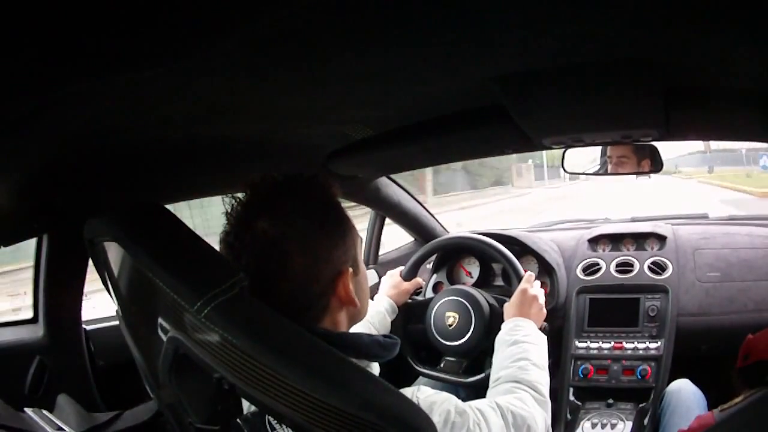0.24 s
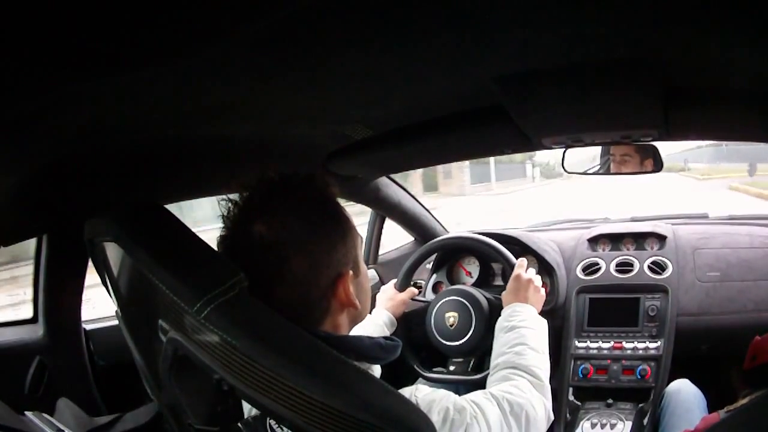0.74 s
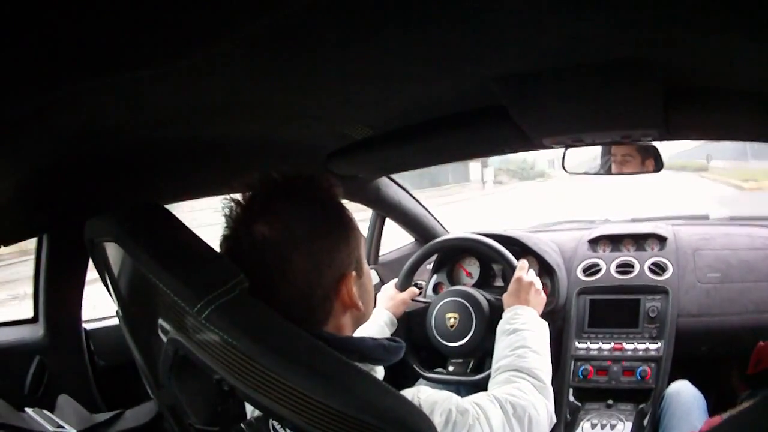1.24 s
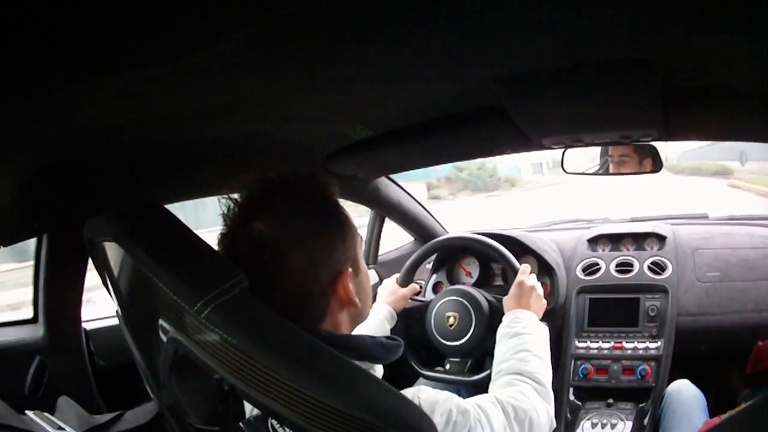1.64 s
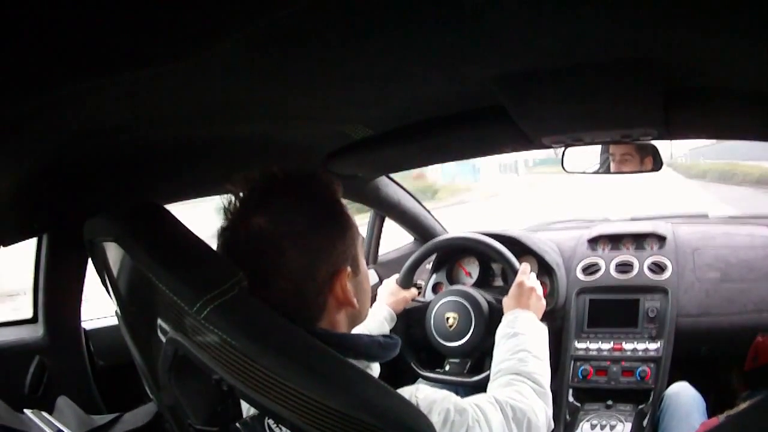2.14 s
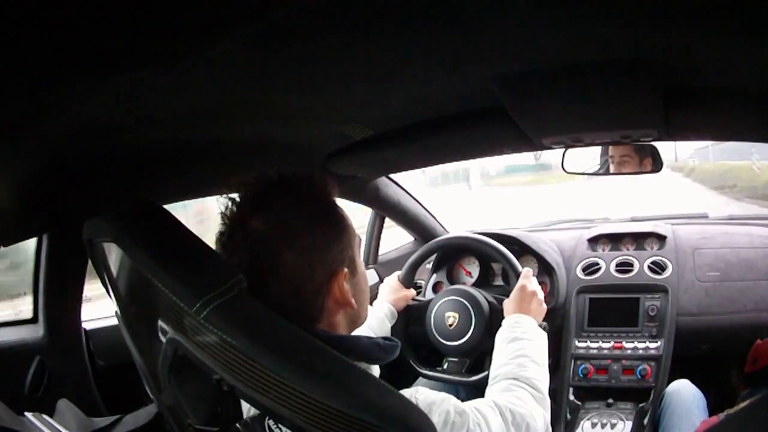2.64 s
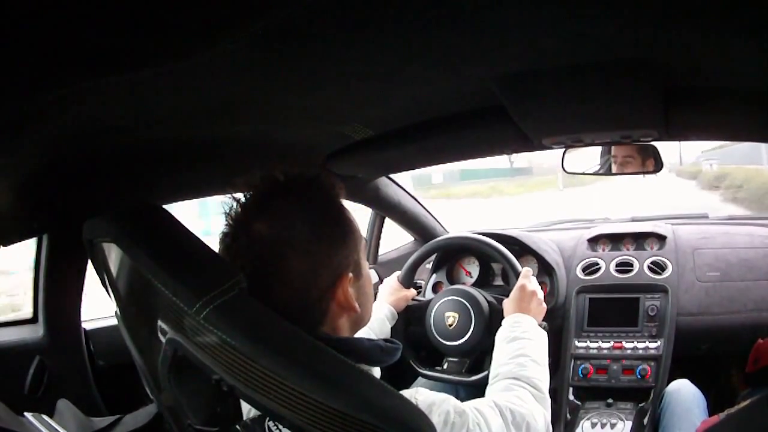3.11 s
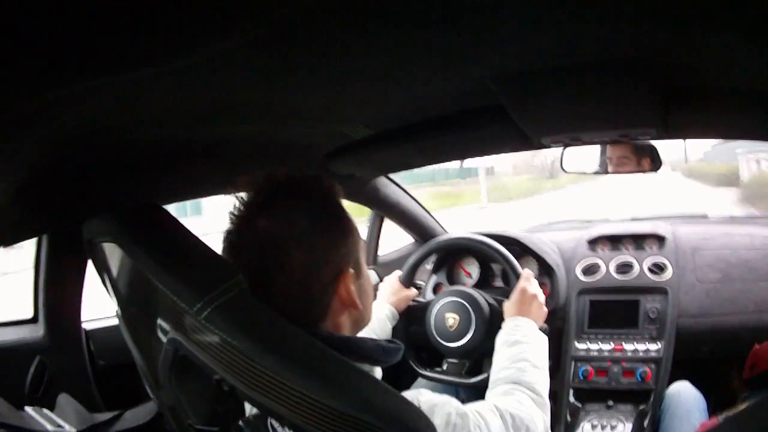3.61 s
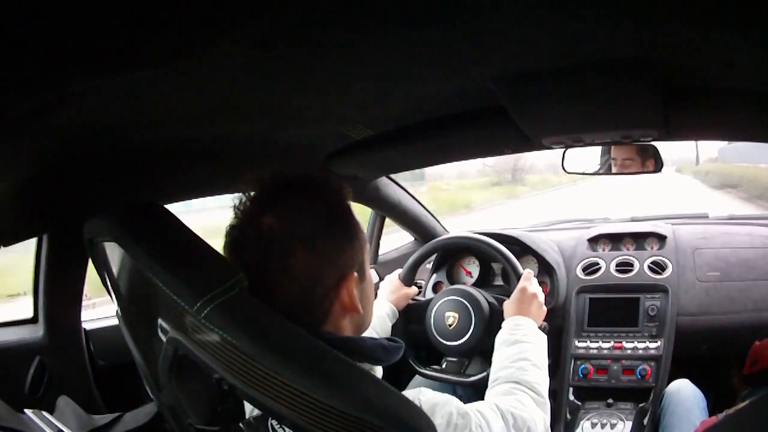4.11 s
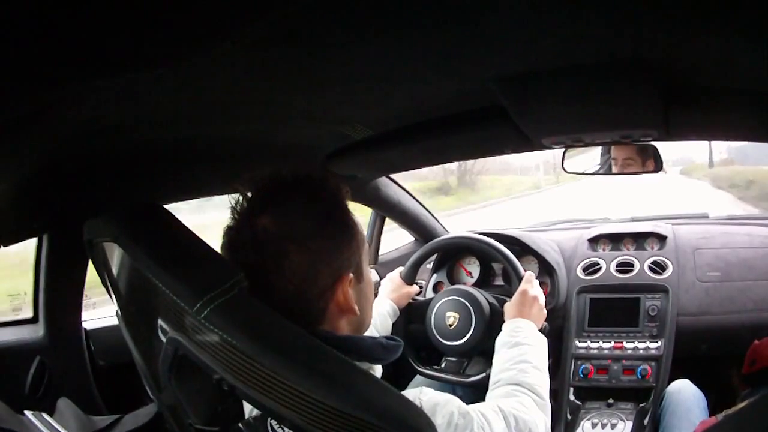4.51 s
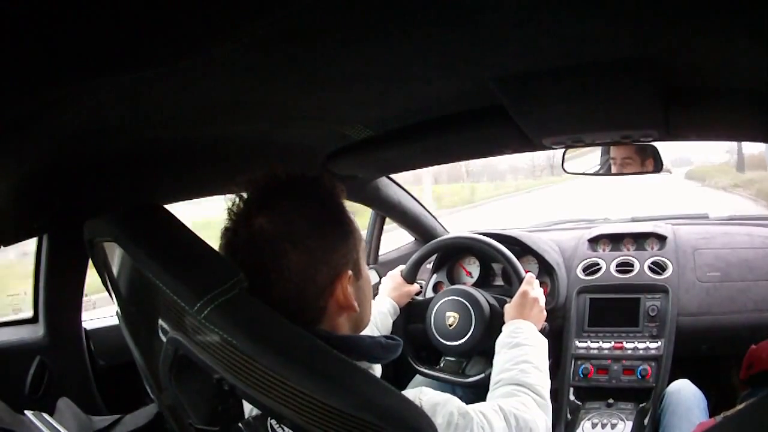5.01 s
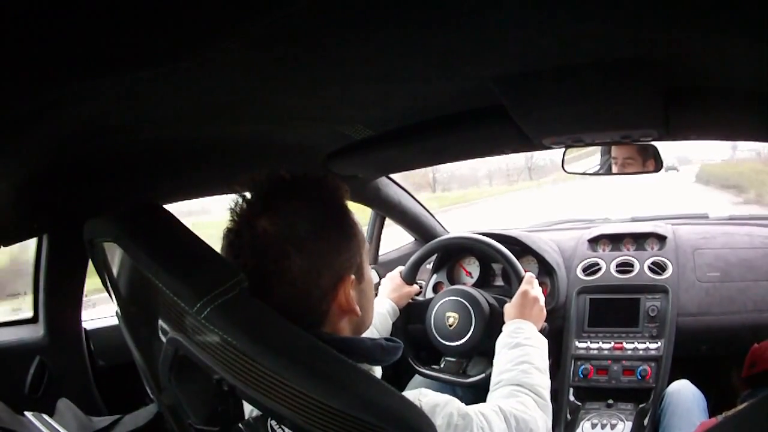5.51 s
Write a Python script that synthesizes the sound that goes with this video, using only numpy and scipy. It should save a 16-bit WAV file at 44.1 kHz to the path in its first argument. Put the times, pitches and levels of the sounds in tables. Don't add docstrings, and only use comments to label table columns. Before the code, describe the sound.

A car rides over patched asphalt, heard from inside: deep bassy thumps, tyre roar, a droning engine that swells midway, and brief plastic knocks.

```python
import sys
import numpy as np
from scipy import signal
from scipy.io import wavfile
from scipy.ndimage import uniform_filter1d, map_coordinates

SR = 44100
rng = np.random.default_rng(int(sys.argv[2]) if len(sys.argv) > 2 else 0)


def master(y):
    cut = np.clip(np.atleast_2d(y).T, -1, 1)
    pcm = np.round(cut * 32767)
    wavfile.write(sys.argv[1], SR, pcm.astype(np.int16))


def amplitude_ratio(level_db):
    exponent = np.asarray(level_db, float) / 20
    return 10 ** exponent


N = 253575
TIME = np.arange(N) / SR

# [t/s, level/dB]
THROTTLE = [(0, -27), (.12, -28.5), (.27, -41), (.5, -43.5), (1.3, -43), (2, -45), (2.3, -35.5), (2.6, -40),
            (2.9, -34.5), (3.3, -28.5), (3.55, -29.5), (3.7, -42), (4.4, -39.5), (5.2, -43.5), (5.75, -48)]
# [t/s, engine cycles per s]
ENGINE_SPEED = [(0, 27), (.5, 26.85), (1.1, 26.6), (2, 26.5), (2.72, 26.62), (3.17, 26.83), (3.47, 27.1),
                (3.8, 27.2), (4.3, 26.9), (5.3, 26.85), (5.75, 26.7)]
# [multiple of the engine cycle, level/dB]
ENGINE_ORDERS = [(1, -9), (2, -7.5), (3, -18.5), (4, -13.5), (5, -9), (6, -13), (7, -22), (8, -7.5),
                 (9, -17), (10, -5), (11, -6.5), (12, -6.5), (13, -16), (14, -9), (15, -8.5), (16, -13.5),
                 (17, -19.5), (18, -22.5), (19, -26.5), (20, -33.5), (21, -19.5), (22, -29.5), (23, -22),
                 (24, -17.5), (25, -18), (26, -28.5), (27, -43), (28, -17), (29, -26.5), (30, -31)]
# [multiple of the engine cycle, level/dB]
GEAR_WHINE = [(50, -68.5)]
# [start t/s, length/s, level/dB]
LUGGING = [
    (.05, 0.21, -45),
    (2.05, 0.32, -43),
    (2.75, 0.17, -45.5),
    (5.1, 0.13, -43.5),
]
# [t/s, level/dB]
SWELLS = [(0.0, -16.5), (1.25, -22.5), (1.34, -15), (1.52, -15), (1.67, -18), (1.84, -4), (2.27, -24),
          (2.34, -5.5), (2.82, -21.5), (3.83, -9.5), (3.91, -22.5), (4.2, -11.5), (4.53, -21.5),
          (5.49, -10), (5.61, -12.5), (5.75, 0)]
# [start t/s, length/s, rumble level/dB, floor drum over the rumble/dB]
PATCHES = [(0, 0.043, -11, -5), (0.297, 0.12, -27.5, -10), (.72, 0.084, -39, -23),
           (1.273, 0.063, -14, -9.5), (1.357, .2, -10.5, -8.5), (1.685, 0.086, -29, -12),
           (1.87, .12, -20, -8), (2.02, 0.17, -18.5, -7.5), (2.183, 0.11, -7.5, -19),
           (2.324, 0.11, -12.5, -14), (2.856, 0.08, -21.5, -22), (3.497, 0.035, -25.5, 3.5),
           (3.623, 0.09, -9.5, -9.5), (3.705, 0.11, -13, -4.5), (4.023, 0.037, -24, -28),
           (4.388, 0.11, -38, -3), (4.545, 0.071, -28.5, 0), (4.673, 0.23, -24, -5), (4.86, 0.13, -24, -11),
           (5.134, 0.13, -24, -23), (5.327, 0.084, -27.5, -12), (5.63, 0.11, -29, -20)]
# [start t/s, length/s, level/dB]
BOOM_RIPPLES = [(0, 0.1, -16), (.72, 0.028, -23), (.98, .05, -23.5), (1.3, 0.067, -13), (2.0, 0.38, -24.5),
                (2.45, 0.29, -30), (3.05, 0.19, -27.5), (3.4, .2, -22), (3.7, 0.23, -24), (4.48, .16, -20),
                (4.7, .08, -20), (4.82, .1, -20.5), (4.98, 0.12, -22.5), (5.15, 0.093, -25)]
# [gain step t/s, height, width/ms, tick level/dB]
JOLTS = [(.006, 0.61, 13.8, -77), (1.328, -0.68, 5.9, -58), (1.3662, 1, 8, -34), (1.401, -.89, 6.4, -38),
         (1.46, .9, 17, -38.5), (1.4766, .78, 5.1, -36), (1.5118, -0.62, 35, -36), (1.56, 0.6, 12, -48),
         (1.5864, -0.5, 10.5, -39), (1.9062, 0.52, 16.3, -39), (1.986, -0.53, 22, -41.5),
         (2.0433, 0.53, 16, -41), (2.0545, 0.4, 7.9, -43.5), (2.094, 0.73, 6.9, -63),
         (2.2178, 0.81, 4.6, -40.5), (2.3352, -0.64, 8.8, -53.5), (2.377, .92, 31, -34),
         (2.4504, -1.04, 21.5, -36.5), (3.64, 1, 4.9, -42.5), (3.6606, -1.6, 4.5, -41),
         (3.6877, 0.8, 19, -39), (3.703, -1.1, 7.8, -53), (3.7423, -0.94, 7, -37.5),
         (3.769, -1.05, 12, -45.5), (3.7913, 0.61, 19, -41), (3.833, 0.99, 6.3, -40.5),
         (3.8482, -0.83, 10.4, -40.5), (5.37, -0.58, 29, -39.5), (5.4404, 0.66, 16.4, -37),
         (5.742, 0.25, 50, -80)]
# [start t/s, length/s, level/dB]
RIBS = [
    (4.68, 0.27, -32.5),
]
# [f/Hz, level/dB per Hz]
RUMBLE_COLOUR = [(15, -13), (25, 6), (40, 5), (62, 6), (85, -9.5), (110, -27), (150, -40)]
# [f/Hz, level/dB per Hz]
DRUM_COLOUR = [(80, 6), (110, -3), (150, -3.5), (220, -12.5), (300, -23), (500, -39), (1200, -67.5),
               (3000, -59)]
# [f/Hz, level/dB per Hz]
ROAR_COLOUR = [(100, -33), (170, -9), (204, 0.5), (237, -4.5), (259, -9.5), (326, -1.5), (374, -4),
               (405, -4.5), (508, -17.5), (551, -11), (654, -13.5), (708, -13), (1060, -29.5),
               (1740, -36.5), (2600, -59.5), (3380, -63), (5720, -120)]
# [start t/s, length/s, level/dB]
SLAPS = [
    (1.35, 0.058, -39.5),
    (2.03, 0.018, -37),
    (2.15, .15, -49.5),
    (3.614, 0.0071, -35.5),
    (3.66, 0.14, -49.5),
]
# [start t/s, length/s, level/dB]
TREAD_SONG = [
    (3.85, .6, -71),
]
# [start t/s, length/s, level/dB]
RATTLE = [
    (1.35, .05, -54),
    (1.44, 0.13, -58.5),
    (2.06, 0.088, -64),
    (2.25, 0.217, -57.5),
    (3.63, .03, -56),
    (3.68, .12, -59),
    (3.83, 0.021, -57),
    (5.37, 0.1, -62),
]
# [f/Hz, level/dB]
RATTLE_COLOUR = [(900, 3), (1300, -17.5), (1700, -7.5), (2200, -11), (3000, -8.5), (3800, -4), (4400, -10),
                 (5200, 0.5), (7000, -21)]
# [start t/s, length/s, level/dB]
SEAL_RUB = [
    (3.635, .015, -55),
    (3.695, .03, -50),
]
# [t/s, ring level/dB, push on the microphone]
KNOCKS = [
    (1.3799, -47, -0.011),
    (1.382, -42, 0.033),
    (1.3845, -21.5, -0.097),
    (1.388, -31.5, 0),
    (2.0583, -29.5, -0.14),
    (3.651, -34, 0.055),
]
# [f/Hz, level/dB, t60/s]
TRIM_MODES = [(403, 10.5, 0.026), (1910, -6.5, .011), (2280, -9, 0.0076), (2980, -3, 0.0059),
              (3400, -11.5, 0.0047), (4530, -18, 0.0057), (5750, -17, 0.0056)]
# [f/Hz, level/dB per Hz]
HISS_COLOUR = [(1410, -44), (2400, -7), (6010, -8.5), (6710, -6), (6870, -7.5), (8900, -7.5), (9630, -6.5),
               (14300, -6.5), (15700, -15)]
# [f/Hz, rms level/dB]; a minus turns a side tone over, so pitch wobbles more than level
WHINE_TONES = [(3160, -86), (3900, -86), (6425, -88), (-6475, -81), (6525, -74), (6575, -88), (9100, -77),
               (9150, -84), (11725, -89), (13000, -90)]


def evened(x):
    return x / np.sqrt(np.mean(x ** 2) + 1e-20)


def curve(rows):
    s, values = np.transpose(rows)
    return np.interp(TIME, s, values)


def wander(hz):
    knots = rng.standard_normal(120)
    return map_coordinates(knots, [TIME[::64] * hz], order=2).repeat(64)[:N]


def bursts(rows, rise_s, t60_s):
    gain = np.zeros(N)
    for s, length, db in rows:
        rise = np.clip((TIME - s) / rise_s + (s < .001), 0, 1)
        gain += rise * amplitude_ratio(db - 60 * np.maximum(TIME - s - length, 0) / t60_s)
    return gain


def noise(points, patchy_db=0):
    hz = np.fft.rfftfreq(2048, 1 / SR)
    f, level_db = np.transpose(points)
    colour_db = np.interp(np.log(hz + 1), np.log(f + 1), level_db, left=-120, right=-120)
    real, imaginary, patches = rng.standard_normal((N // 512 + 5, 1025, 3)).T
    patches = uniform_filter1d(patches, size=8, axis=0)
    patches = evened(uniform_filter1d(patches, size=6, axis=1))
    spectra = (real + 1j * imaginary) * amplitude_ratio(colour_db[:, None] + patchy_db * patches)
    return evened(signal.istft(spectra, nperseg=2048, noverlap=1536)[1][:N])


def resonance(hz, width_hz):
    r = np.exp(-np.pi * width_hz / SR)
    slow = rng.standard_normal((N + SR, 2)) @ [1, 1j]
    for _ in range(2):
        slow = signal.lfilter([1], [1, -r], slow)
    return evened((slow[SR:] * np.exp(2j * np.pi * hz * TIME)).real)


def crest(lag_s, width_ms):
    return amplitude_ratio(-np.log10(2) * 80 * (lag_s * 1000 / width_ms) ** 2)


def engine():
    turns = np.cumsum(curve(ENGINE_SPEED)) / SR
    firing_db = curve(THROTTLE)
    throttle_db = firing_db + 42
    uneven_db = -45.5 + 0.62 * throttle_db
    bank_db = -44 + 0.22 * throttle_db
    bank_db = 20 * np.log10(amplitude_ratio(bank_db) + bursts(LUGGING, rise_s=0.16, t60_s=1.8))
    out = np.zeros(N)
    for k, db in ENGINE_ORDERS:
        if k % 10 == 0:
            drive_db = firing_db + 4
        elif k % 5 == 0:
            drive_db = bank_db + 9.0
        else:
            drive_db = uneven_db + 5.0
        loose = .6 if k % 5 == 0 else 1
        level = amplitude_ratio(db + drive_db + 2.0 * loose * wander(6))
        phase = k * turns + rng.random() + 0.027 * loose * wander(3.6)
        out += level * np.sin(2 * np.pi * phase)
    for k, db in GEAR_WHINE:
        out += amplitude_ratio(db + 1.0 * wander(9)) * np.sin(2 * np.pi * (k * turns + 0.15 * wander(14)))
    return np.sqrt(2) * out


def road():
    rumble_rows = [(s, length, db) for s, length, db, _ in PATCHES]
    drum_rows = [(s, length, db + over_db) for s, length, db, over_db in PATCHES]
    rumble = amplitude_ratio(-29.5 + 0.4 * wander(7.4)) + bursts(rumble_rows, rise_s=0.024, t60_s=0.35)
    drum = amplitude_ratio(-34.5 + 3.0 * wander(4.9)) + bursts(drum_rows, rise_s=0.038, t60_s=0.58)
    boom = amplitude_ratio(-32.5) + bursts(BOOM_RIPPLES, rise_s=0.015, t60_s=0.41)

    bed = amplitude_ratio(curve(SWELLS) - 1.0) * resonance(10, width_hz=12)
    bed += amplitude_ratio(-5.5) * boom * resonance(94.5, width_hz=9.3)
    shaft_phase = 94.8 * TIME + 0.028 * wander(2.947)
    bed += amplitude_ratio(-35.0 + 2.9 * wander(4.085)) * np.sin(2 * np.pi * shaft_phase)
    bed += rumble * noise(RUMBLE_COLOUR, patchy_db=-0.5)
    bed = bed / np.sqrt(1 + uniform_filter1d(bed ** 2, size=1500) / 0.18)

    floor = amplitude_ratio(-6.0) * drum * noise(DRUM_COLOUR, patchy_db=3.0)
    floor += bursts(RIBS, rise_s=0.16, t60_s=0.37) * resonance(199, width_hz=4.6)

    jolts = np.zeros(N)
    for s, height, width_ms, _ in JOLTS:
        near = slice(max(round((s - .1) * SR), 0), round((s + .1) * SR))
        jolts[near] += height * crest(TIME[near] - s + .002, width_ms)
    give = np.clip(1 - 1.03 * uniform_filter1d(abs(jolts), size=300), .15, 1)
    give *= np.clip(np.minimum(4 * TIME, TIME[-1] - TIME) / .06, 0, 1)
    return jolts + give * bed + floor


def tyres():
    roar = amplitude_ratio(-41 + 1.0 * wander(7)) + bursts(SLAPS, rise_s=.03, t60_s=0.18)
    song = amplitude_ratio(-70.5) + bursts(TREAD_SONG, rise_s=0.089, t60_s=1.4)
    return amplitude_ratio(6.5) * roar * noise(ROAR_COLOUR, patchy_db=0.53) + song * resonance(1725, width_hz=110)


def rattle():
    f, level_db = np.transpose(RATTLE_COLOUR)
    struck = rng.random(N) < 4500 / SR
    sizes = amplitude_ratio(1.9 * np.minimum(rng.exponential(1, N), 4)) * struck
    kind = rng.integers(0, 24, N)
    grains = np.zeros(N)
    for k, hz in enumerate(np.geomspace(f[0], f[-1], num=24)):
        t = TIME[:round(11 / hz * SR)]
        grain = np.sin(2 * np.pi * hz * t) * np.sin(np.pi * t / t[-1]) ** 2
        grain *= amplitude_ratio(np.interp(hz, f, level_db))
        grains += signal.oaconvolve(sizes * (kind == k), grain)[:N]
    chatter = (amplitude_ratio(-76.5) + bursts(RATTLE, rise_s=0.03, t60_s=0.12)) * evened(grains)
    return chatter + bursts(SEAL_RUB, rise_s=.015, t60_s=0.11) * resonance(1450, width_hz=550)


def trim():
    t = TIME[:3000]
    hits, pushes = np.zeros(N), np.zeros(N)
    for s, db, push in KNOCKS:
        hits[round(s * SR)] = amplitude_ratio(db)
        pushes[round(s * SR)] = push
    ring = sum(amplitude_ratio(db - 60 * t / t60) * np.sin(2 * np.pi * hz * t) for hz, db, t60 in TRIM_MODES)
    ring *= 1 - np.exp(-t / 0.00037)
    soften = signal.butter(3, 1700, fs=SR, output="sos")
    shove = signal.sosfilt(soften, np.exp(-t / .003))
    return (signal.oaconvolve(hits, ring) + signal.oaconvolve(pushes, shove))[:N]


def scene():
    return (engine() + road() + tyres() + rattle() + trim())[None]


def gain_ticks():
    restep_s, restep_db, overload = .0062, -3, .5
    edges = np.zeros(N + SR)
    for s, height, width_ms, db in JOLTS:
        for k in range(-2, 3):
            strength = 1
            if k:
                over = abs(height) * crest(k * restep_s, width_ms) - overload
                strength = amplitude_ratio(restep_db * abs(k)) * np.clip(over / .1, 0, 1)
            at = max(round((s + k * restep_s) * SR), 0)
            edges[at] -= np.sign(height) * amplitude_ratio(db + 8.5) * strength
    return signal.lfilter([1], [1, -np.exp(-1 / (0.003 * SR))], edges[:N])


def top_cut(x):
    return signal.sosfilt(signal.butter(12, 15820, fs=SR, output="sos"), x)


def record(dry):
    whine = sum(amplitude_ratio(db + 3) * np.sin(2 * np.pi * hz * TIME) for hz, db in WHINE_TONES)
    hiss = amplitude_ratio(-65) * noise(HISS_COLOUR, patchy_db=2.0)
    wet = np.clip(dry, -1, 1) + gain_ticks() + whine + hiss
    return top_cut(np.clip(wet, -1, 1))


dry = scene()
out = record(dry)
master(out)
```